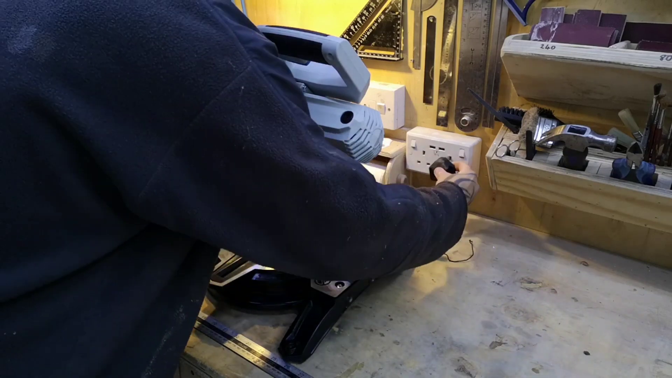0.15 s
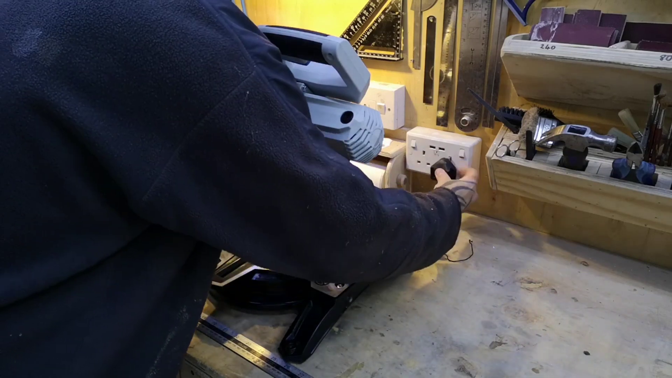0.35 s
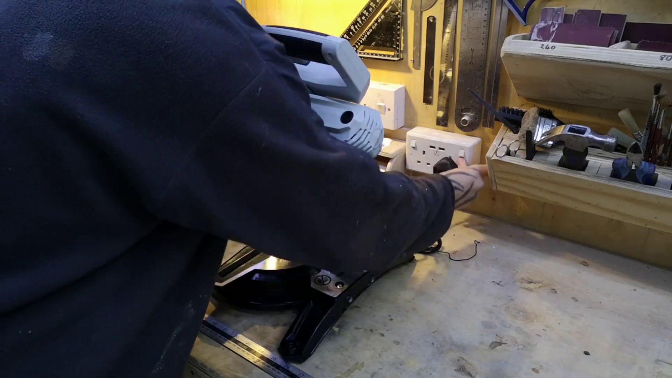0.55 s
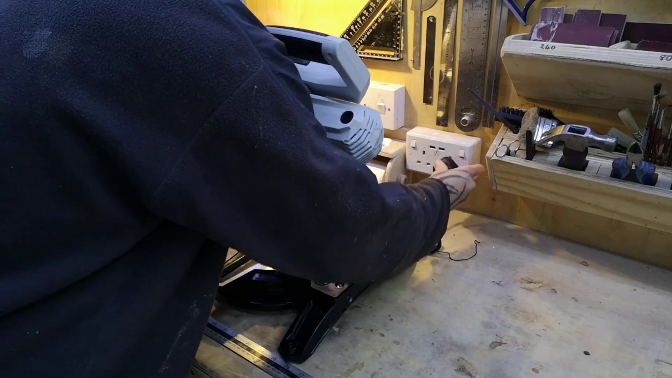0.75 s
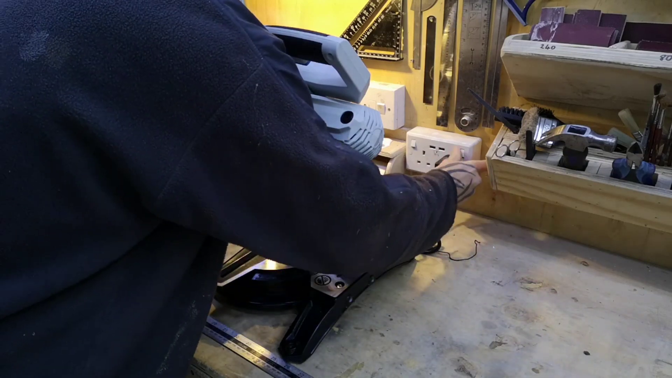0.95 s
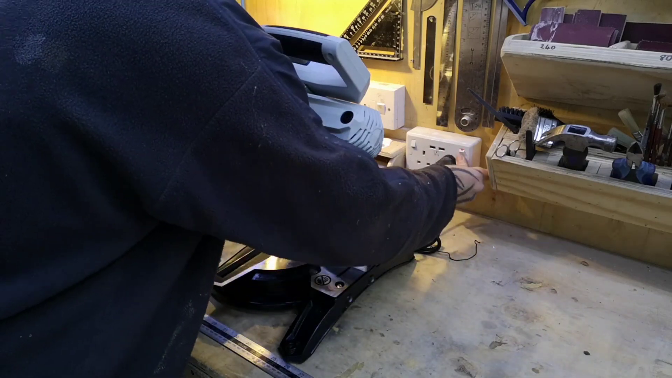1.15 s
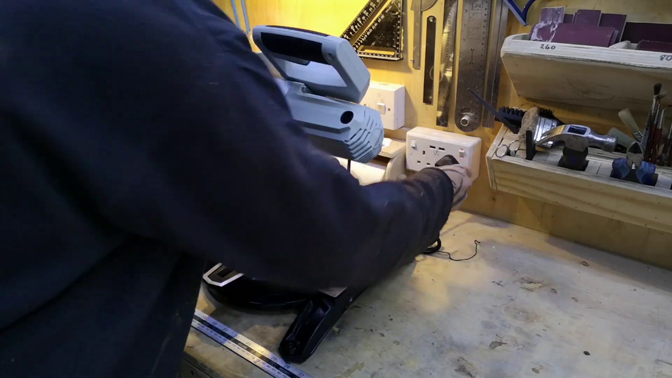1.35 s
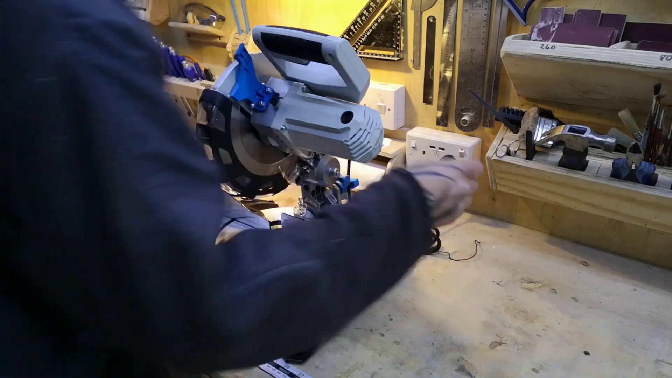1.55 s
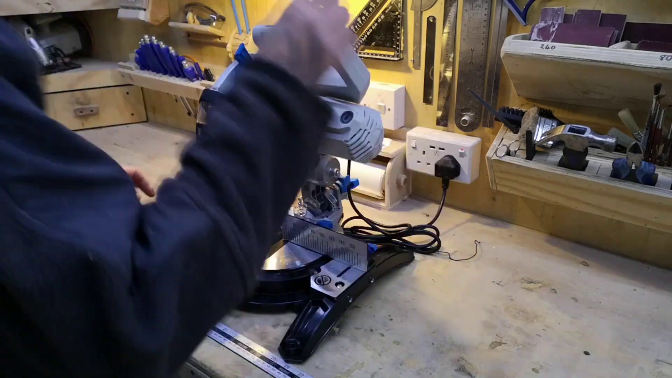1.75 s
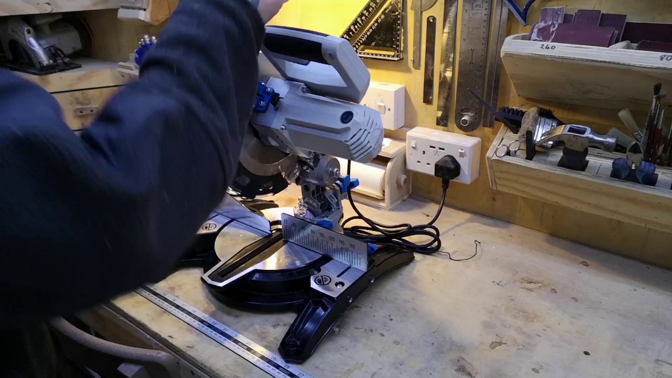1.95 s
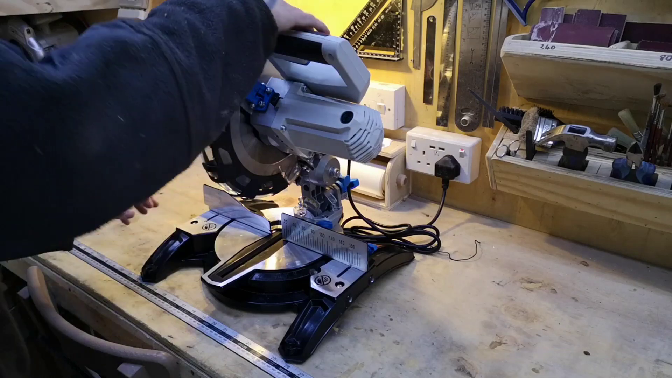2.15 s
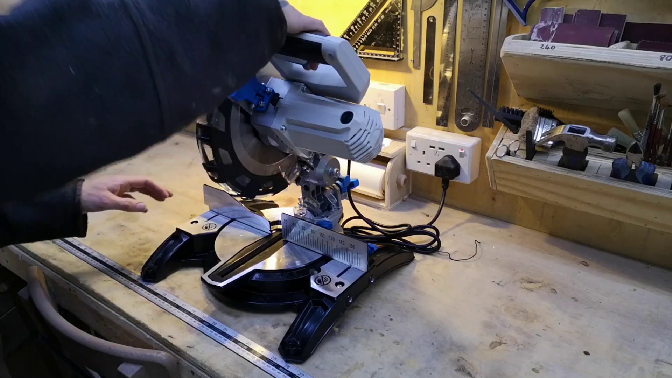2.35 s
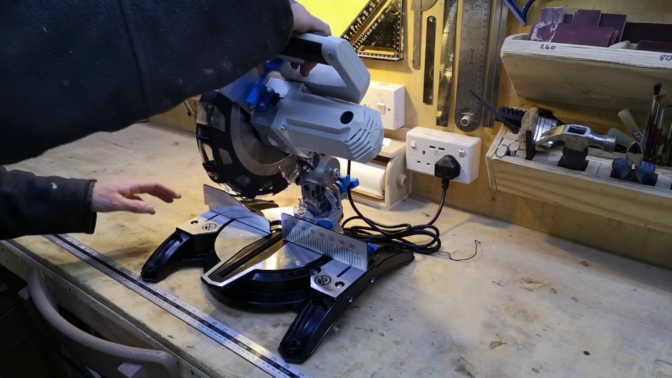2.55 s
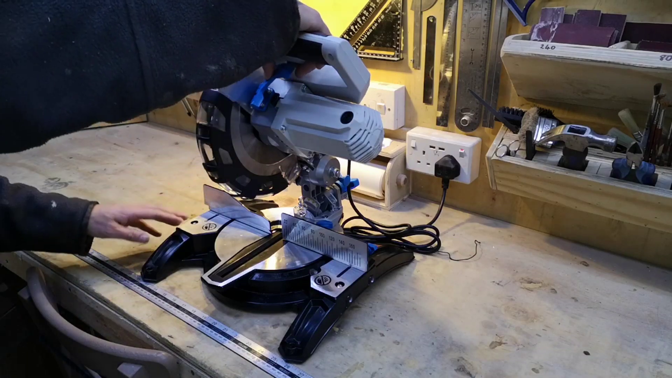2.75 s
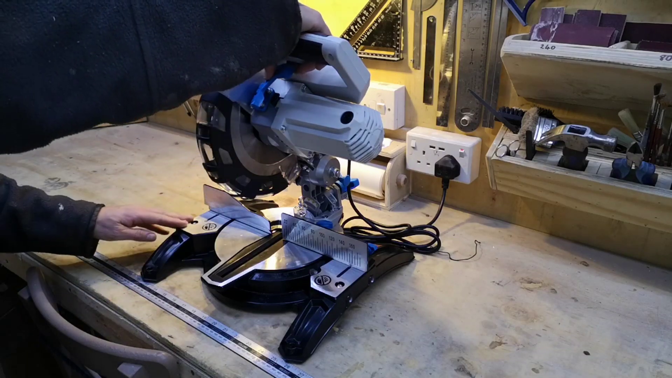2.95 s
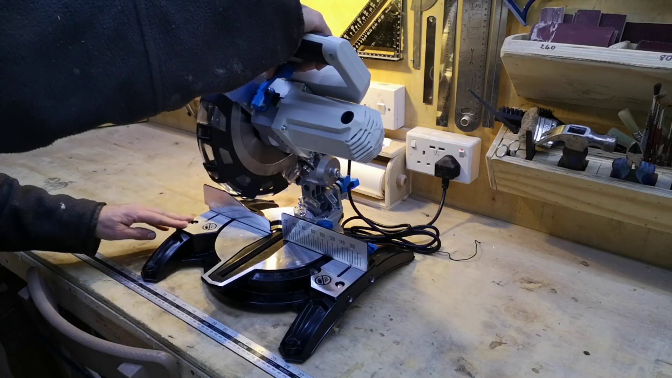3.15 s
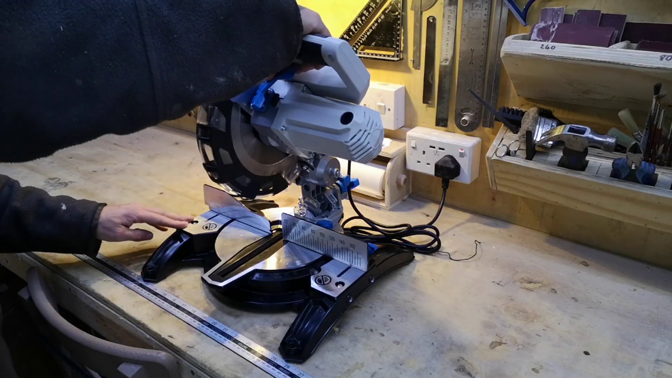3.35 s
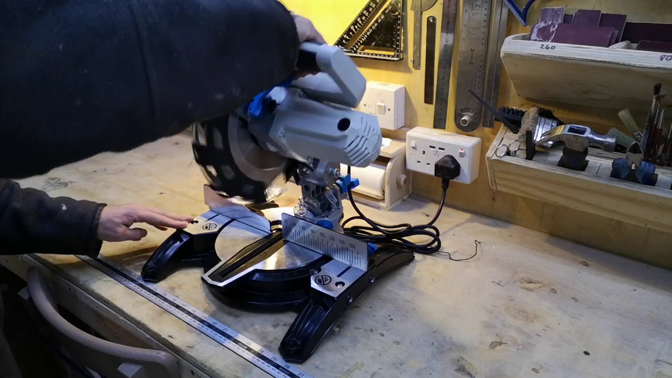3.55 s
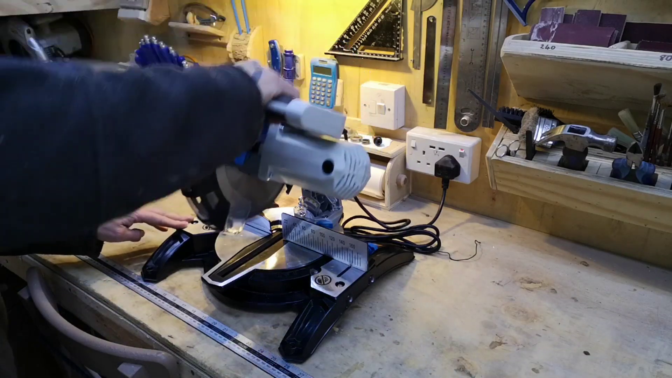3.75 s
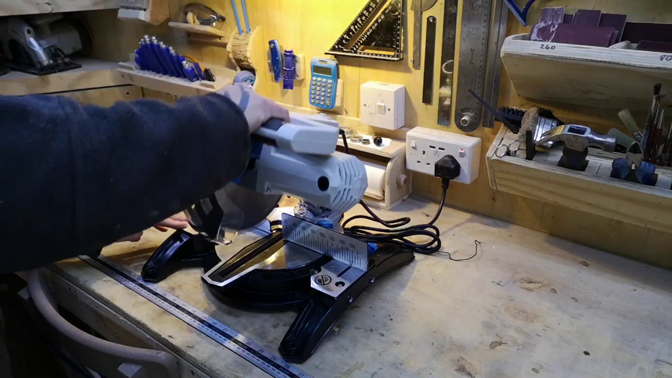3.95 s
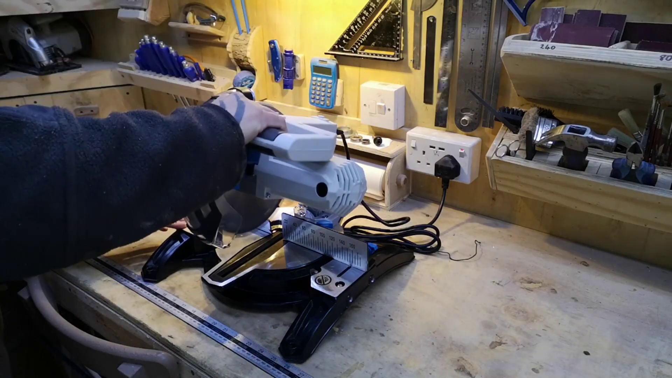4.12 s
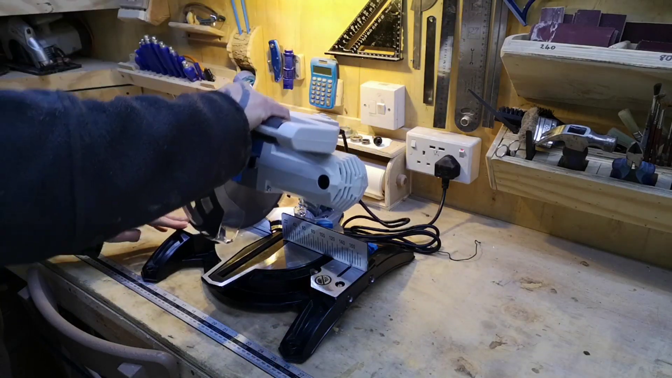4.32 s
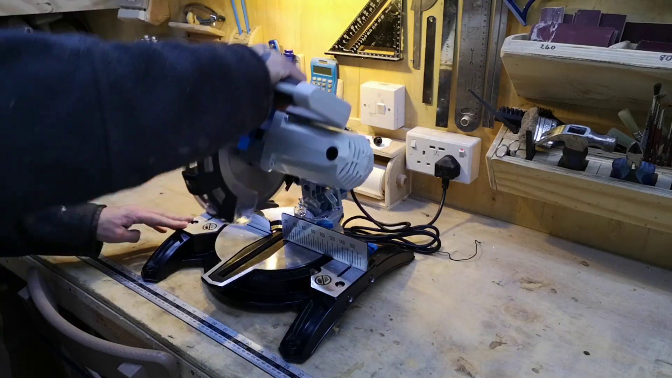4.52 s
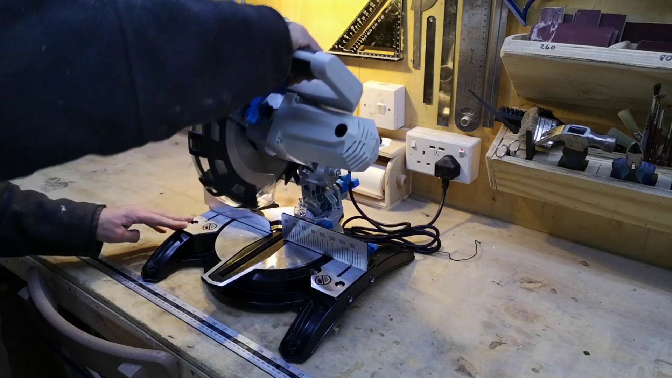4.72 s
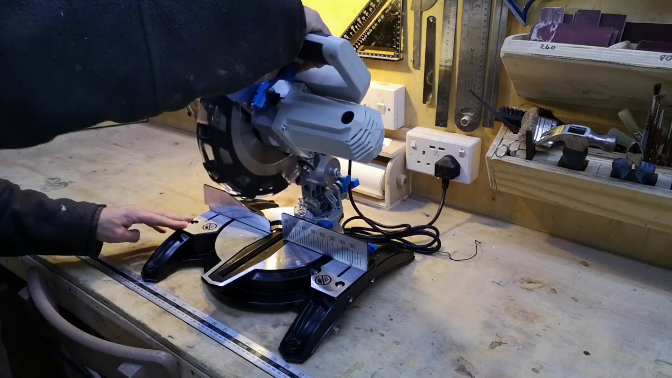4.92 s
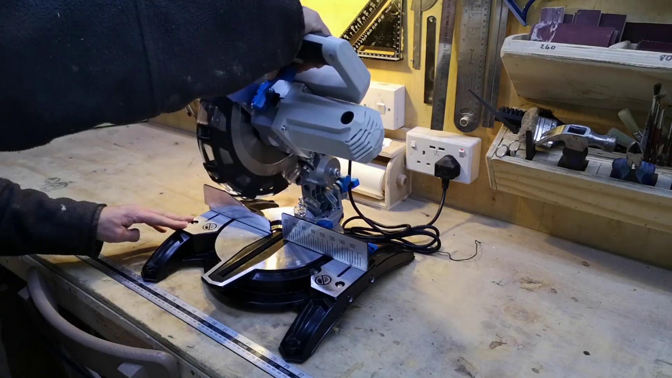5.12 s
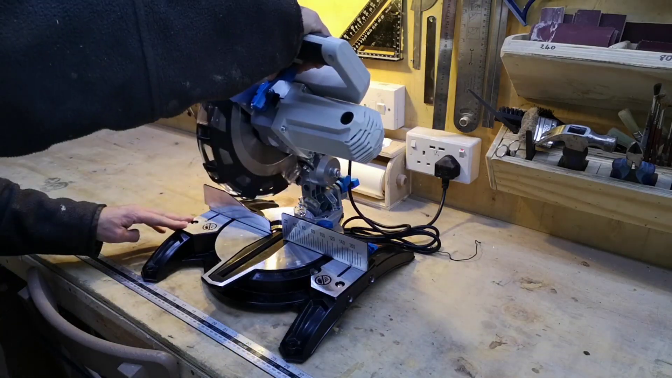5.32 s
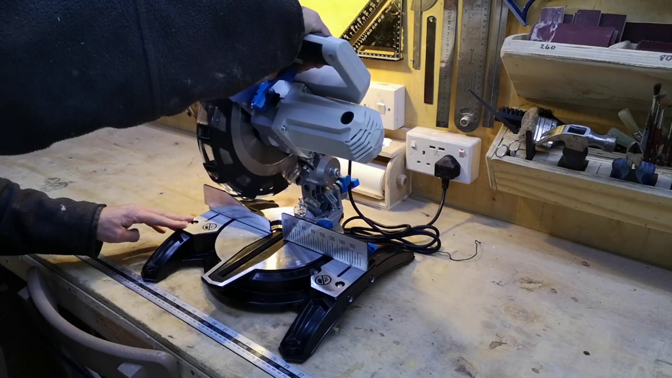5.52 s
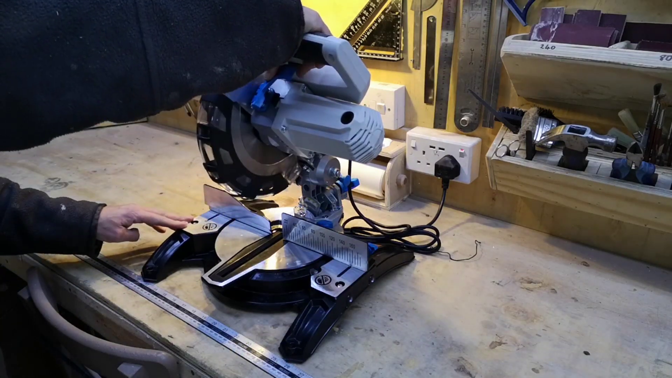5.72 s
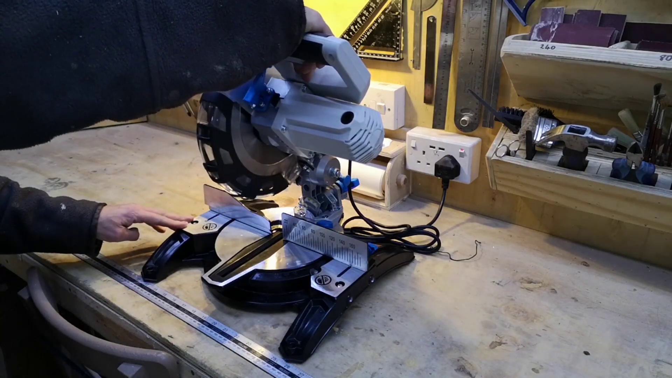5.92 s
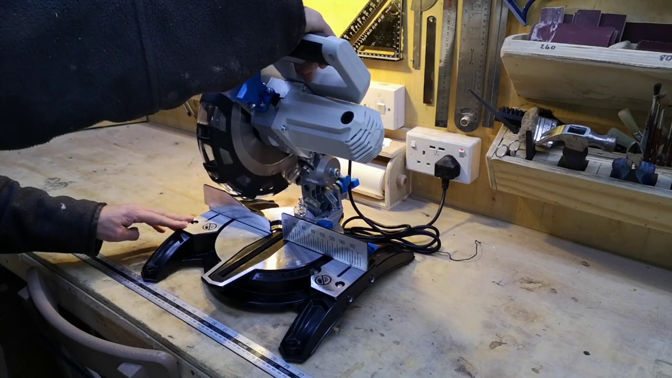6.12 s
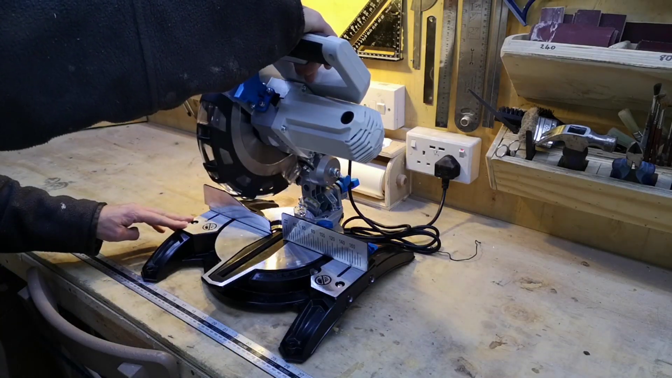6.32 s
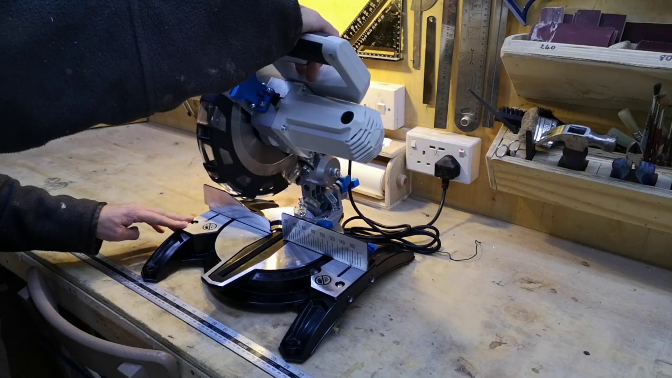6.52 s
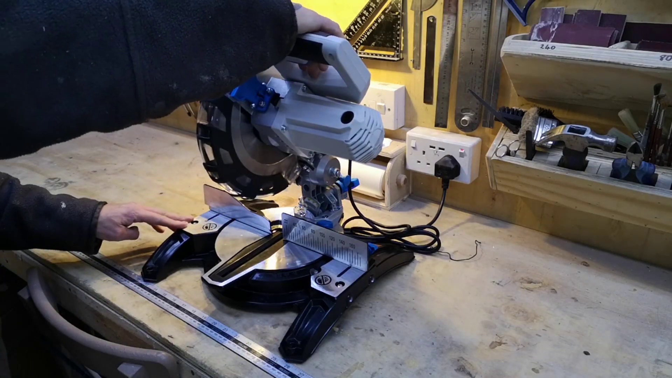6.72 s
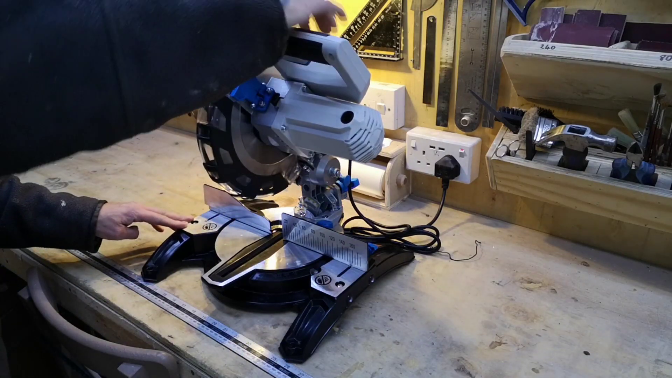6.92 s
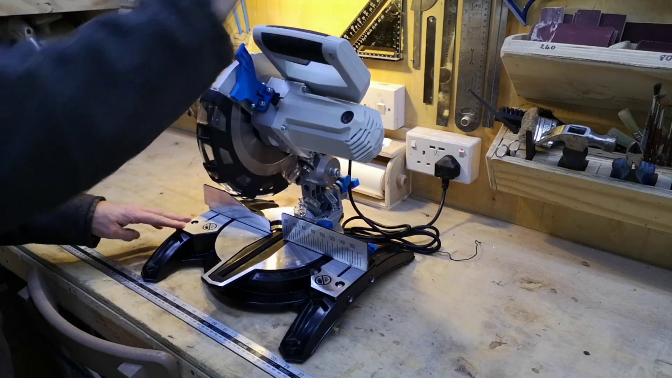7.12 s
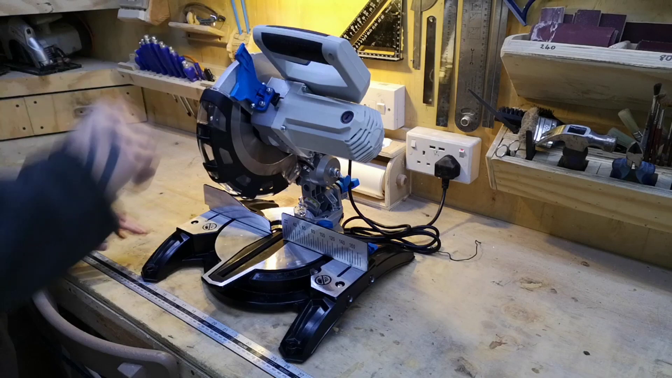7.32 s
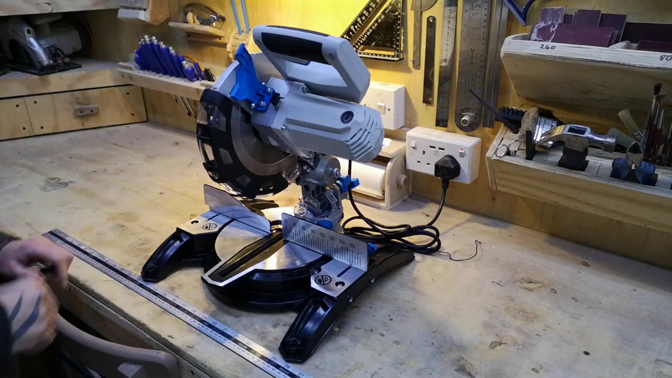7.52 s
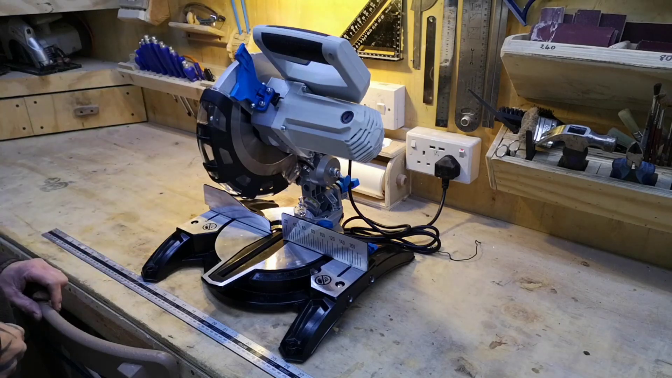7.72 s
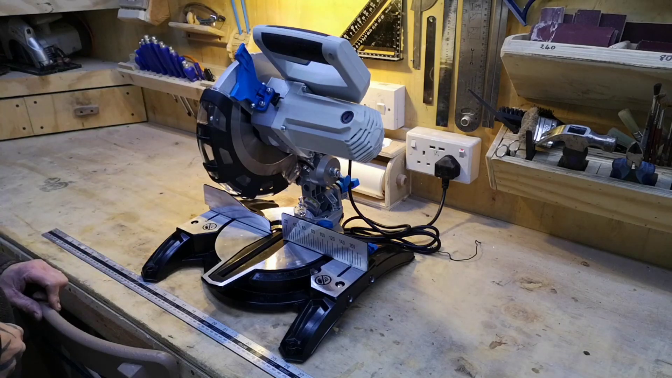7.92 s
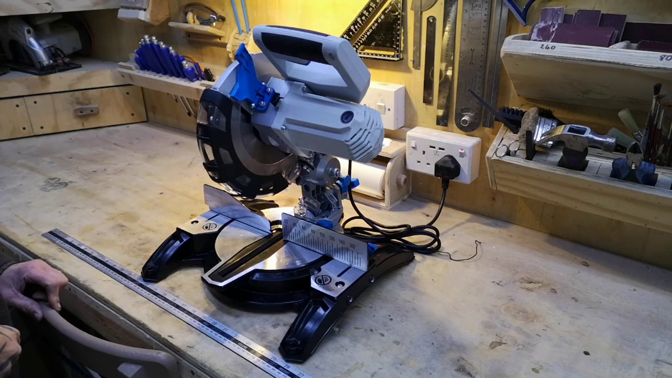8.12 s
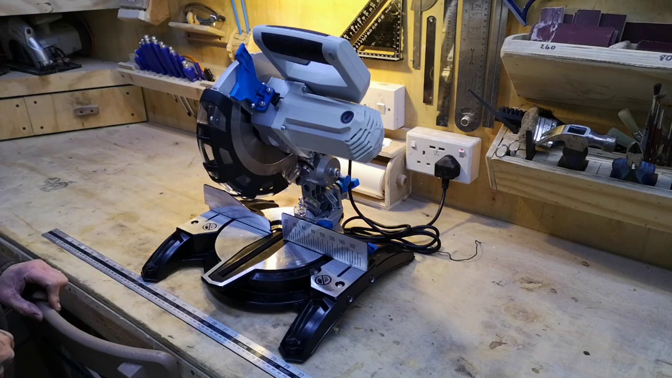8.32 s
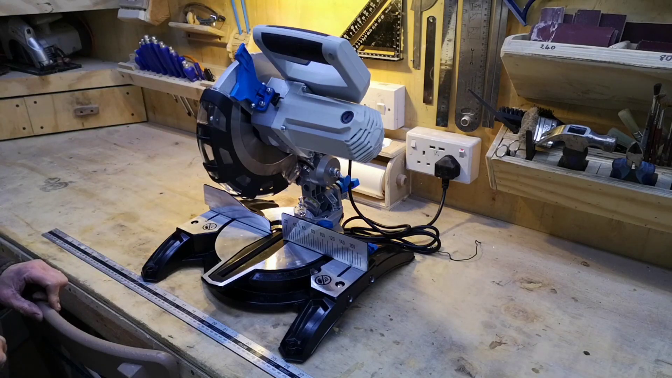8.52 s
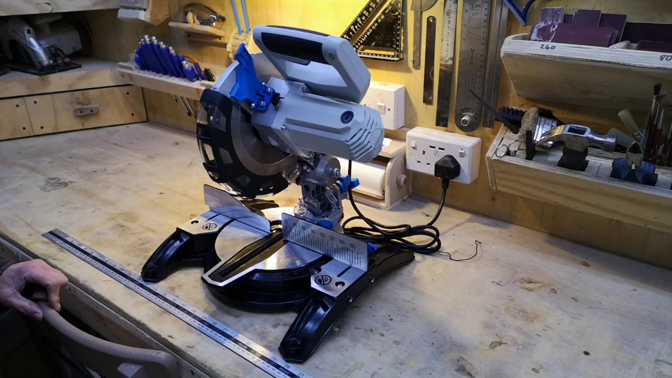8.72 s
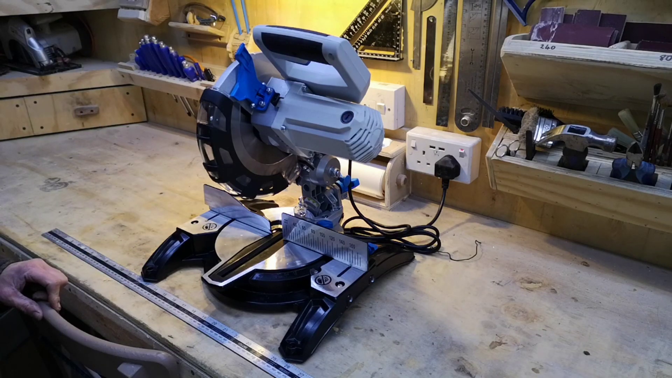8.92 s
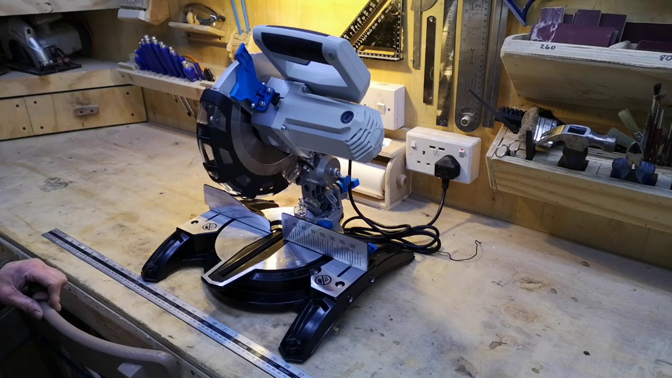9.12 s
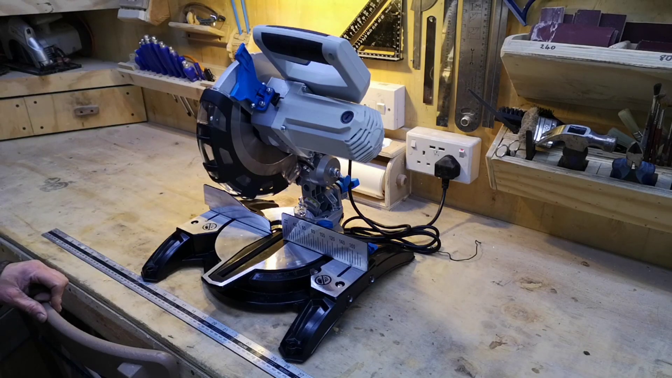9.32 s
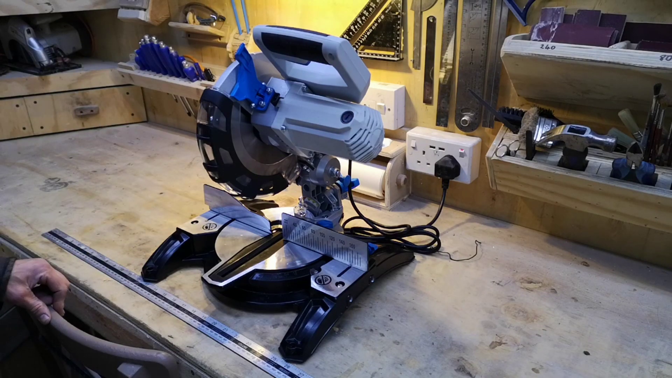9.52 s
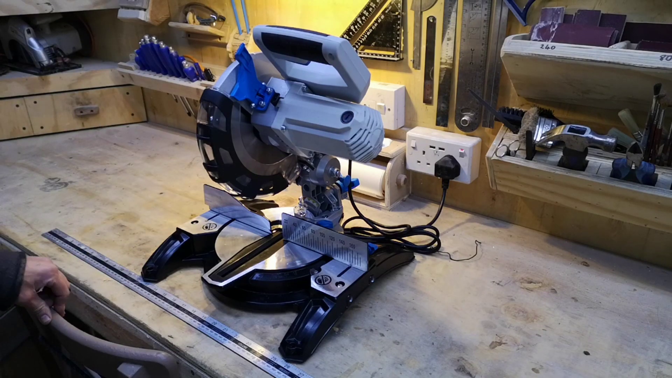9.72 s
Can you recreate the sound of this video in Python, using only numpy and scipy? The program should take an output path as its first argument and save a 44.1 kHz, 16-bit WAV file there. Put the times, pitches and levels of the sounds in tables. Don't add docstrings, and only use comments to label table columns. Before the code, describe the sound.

Handling clicks and bench thuds, a hard switch clack, a loud raspy electric saw running free about three seconds, then a long grinding spin-down.

```python
import sys
import numpy as np
from scipy import signal
from scipy.fft import rfft, irfft
from scipy.io import wavfile
from scipy.ndimage import uniform_filter1d

SR = 44100
rng = np.random.default_rng(int(sys.argv[2]) if len(sys.argv) > 2 else 0)


def wav_record(signal):
    frames = np.transpose(np.atleast_2d(signal))
    bounded = np.clip(frames, -1, 1)
    quanta = np.round(bounded * 32767).astype(np.int16)
    wavfile.write(sys.argv[1], SR, quanta)


def invert_db(level):
    return 10 ** (np.asarray(level, dtype=float) / 20)


N = 434826
T = np.arange(N) / SR
HZ = np.fft.rfftfreq(N, 1 / SR)


def noise():
    return rng.standard_normal(N)


def unit(x):
    return x / np.sqrt(np.mean(x ** 2))


def response(points, rings=(), lift_db=0., edge_db=-80.):
    f, db = np.transpose(points)
    gain = invert_db(np.interp(np.log(HZ + 1), np.log(f), db, left=edge_db, right=edge_db))
    for hz, width_hz, ring_db in rings:
        gain = gain * (1 + invert_db(lift_db + ring_db) / (1 + (2 * (HZ - hz) / width_hz) ** 2))
    return gain


def shape(x, *colour):
    return irfft(rfft(x) * response(*colour), N)


def band(x, lo_hz, hi_hz):
    edges_hz = [lo_hz, min(hi_hz, .49 * SR)]
    return signal.sosfilt(signal.butter(3, edges_hz, "band", fs=SR, output="sos"), x)


def ring(x, hz, t60_s):
    pole = np.exp(2j * np.pi * hz / SR - np.log(1000) / (t60_s * SR))
    return signal.lfilter([1], [1, -pole], x).imag


def walk(rate_hz):
    k = int(SR / rate_hz)
    held = np.repeat(rng.standard_normal(N // k + 1), k)
    return 1.173 * uniform_filter1d(uniform_filter1d(held, k), k)[:N]


# frequency in Hz, side minus mid in dB.
PORT_SIDE = [(60, -25), (110, -9), (200, -5), (380, -7.5), (690, 4), (1270, -6), (2340, -1), (4320, 1),
             (7960, 1), (14700, 0)]
# frequency in Hz, left minus right in dB.
PORT_LEAN = [(60, 4), (110, -3), (200, 2.5), (380, -1), (690, 2), (1270, 0), (2340, 2), (4320, 1),
             (7960, 7), (14700, -13)]


def ports(air, alike=0.21):
    mid, other = rfft(air)
    side = np.sqrt(1 - alike ** 2) * other + 1j * alike * mid
    side = side * response(PORT_SIDE, (), 0, 0)
    lean = np.sqrt(response(PORT_LEAN, (), 0, 0))
    return irfft(np.array([(mid + side) * lean, (mid - side) / lean]), N)


# frequency in Hz, level in dB per Hz.
SHOP = [(35, -32), (60, 4), (95, -4.5), (132, -10), (151, -5.5), (448, -23), (1100, -24.5), (1240, -24),
        (1830, -19.5), (2010, -22), (2650, -23), (3120, -27), (15000, -45.5)]


def still_floor():
    hiss = shape(rng.standard_normal((2, N)), SHOP, [(7500, 530, 4.6)])
    return unit(hiss) * invert_db(-57.5)


# start in seconds, sway in dB, thud in dB, rustle in dB.
PUSHES = [(.05, -65, -38, -45), (.22, -41, -46, -47), (.34, -43, -40, -46), (.5, -26.5, -21, -48),
          (.62, -38, -39, -64), (.9, -20, -36, -55), (1., -35, -27.5, -41.5), (1.12, -42, -50, -47),
          (2.25, -38.5, -64, -60), (2.55, -60, -70, -66), (2.95, -52, -62, -67)]


def pushed(column, rise_s, settle_t60_s):
    level = np.zeros(N)
    for push in PUSHES:
        t = np.maximum(T - push[0], 0)
        level += invert_db(push[column] - 60 * t / settle_t60_s) * (1 - np.exp(-t / rise_s))
    return level


def handling():
    sway_hz = 36.4 * (1 + 0.063 * walk(10))
    sway = pushed(1, 0.077, 0.69) * invert_db(7.5) * np.sin(2 * np.pi * np.cumsum(sway_hz) / SR)
    thud = pushed(2, 0.018, 0.32) * invert_db(-0.5) * unit(band(noise(), 51, 290))
    rustle = pushed(3, 0.04, 0.46) * invert_db(-8) * unit(shape(noise(), SHOP[5:]))
    return rustle, sway + thud


# start in seconds, peak in dB, panel in dB, treble in dB, decay t60 in seconds.
PLUG = [(0.068, -45.5, -2, -13, 0.58), (0.144, -39, 1.5, 12, 0.052), (0.227, -16, -3, -14, 0.062),
        (0.339, -10, -6.5, -14.5, 0.058), (0.355, -39.5, 14, -20, 0.13), (0.378, -36.5, 16, -27, 0.11),
        (0.468, -25, -1.5, -19, 0.22), (0.503, -16, -22, -6, 0.065), (0.517, -20, -13, -28, 0.13),
        (0.579, -28, 0, -5.5, 0.12), (0.63, -23, 0, -11, 0.022), (0.888, -35.5, 6.5, -12, 0.17),
        (0.914, -16, 0, -11.5, 0.084), (0.927, -25.5, 6.5, -18, 0.12), (0.949, -33, -4, -24, 0.27),
        (1.203, -25.5, -13, 0.5, 0.045), (1.227, -39, -11, -15, 0.065), (1.444, -51.5, -4, -1, 0.15),
        (2.199, -50, -13, 5, 0.32), (3.09, -7.5, -28, -32, 0.82)]
# start in seconds, peak in dB, note in dB, treble in dB, note in Hz.
GRIP = [
    (1.769, -60, 9, -13, 395),
    (1.901, -45, -19, -4, 662),
    (2.211, -49.5, 1, 9, 553),
    (2.236, -45.5, -16, 9, 568),
    (2.499, -54, -1, -17, 643),
    (3.036, -41.5, -22, -24, 681),
    (3.082, -22, -28, 5.5, 700),
]
# frequency in Hz, level in dB, decay t60 in seconds.
PANEL = [(193, -24, 0.08), (870, -20, 0.073), (1420, -27, 0.039)]
# frequency in Hz, level in dB per Hz.
KNOCK_BODY = [(290, -17), (500, -7), (620, -1), (866, 3.5), (1110, -3), (1470, 3.5), (2360, -3.5),
              (2780, -4), (5000, -14.5), (6500, -16.5), (11000, -120)]
# frequency in Hz, level in dB per Hz.
KNOCK_TOP = [(2350, 0), (4000, -2.5), (6370, -3), (7640, 2.5), (9690, -10.5), (10500, -26), (11300, -22),
             (13700, -35), (15000, -35)]


def knocks(rattle_s=0.012, socket_hz=344, grip_t60_s=0.089):
    mid, top = unit(shape(noise(), KNOCK_BODY)), unit(shape(noise(), KNOCK_TOP))
    grit = noise()
    snap = unit(band(grit, 12000, 14000))
    t = T[:SR // 2]
    rattle = np.exp(-t / rattle_s)
    contacts = [(*k[:4], socket_hz, k[4]) for k in PLUG] + [(*k, grip_t60_s) for k in GRIP]
    out = np.zeros(N)
    for start_s, peak_db, panel_db, treble_db, note_hz, t60_s in contacts:
        a = int(start_s * SR)
        span = slice(a, a + len(t))
        env = invert_db(-60 * t / max(t60_s, .02)) * (1 + 2.6 * np.exp(-t / 0.003))
        hit = env * (mid[span] + invert_db(treble_db) * top[span])
        push = grit[span] * rattle
        panel = ring(push, note_hz, 0.38 * t60_s)
        panel = panel + sum(invert_db(db) * ring(push, hz, decay_s) for hz, db, decay_s in PANEL)
        hit = hit + invert_db(panel_db + 12.5) * panel / np.abs(panel).max()
        hit = hit + invert_db(2 * min(treble_db, 0) - 10) * snap[span] * rattle
        out[span] += invert_db(peak_db - 14.5) * hit * np.minimum(t / 0.0013, 1)
    return out * invert_db(np.array([[2.2], [-2.2]]))


def room(x, t60_s=0.25, echo_db=4.5, mono_hz=320):
    t = T[:SR // 3]
    echo = rng.standard_normal((2, len(t))) * invert_db(-60 * t / t60_s) * (t > .002)
    echo = echo / np.sqrt(np.sum(echo ** 2, axis=1, keepdims=True)) * invert_db(echo_db)
    echo[0, 3] += 1
    echo[1, 0] += 1
    left, right = signal.fftconvolve(x, echo, axes=1)[:, :N] / 2
    side = band(left - right, mono_hz, SR)
    return np.array([left + right + side, left + right - side])


PINION, GEAR, VANES, TIPS = 6, 38, 27, 40
ON_S, CUT_S, TOP_SPEED = 3.09, 5.816, 489.6
# shortfall in turns per s, time constant in seconds.
SHORTFALL = [(328, .171), (79, .66)]
DRAG = (41.2, .1869, .000934)


def rotor():
    since = np.maximum(T - ON_S, 0)
    pulling = TOP_SPEED - sum(short * np.exp(-since / tau_s) for short, tau_s in SHORTFALL)
    slowing = [pulling[int(CUT_S * SR)]]
    for _ in range(4200):
        slowing.append(slowing[-1] - np.polyval(DRAG[::-1], slowing[-1]) / 1000)
    coasting = np.interp(T, CUT_S + np.arange(len(slowing)) / 1000, slowing)
    return np.where(T < CUT_S, pulling, coasting)


def law(speed, top_db, decade_db, start_db=0):
    wake = np.exp(-np.maximum(T - 3.1, 0) / 0.075)
    return top_db + decade_db * np.log10(speed / TOP_SPEED) + start_db * wake


def lift(hz, body):
    return 20 * np.log10(1 + sum(invert_db(db) / (1 + (2 * (hz - f) / width_hz) ** 2) for f, width_hz, db in body))


def whine(order, turns, db, smear_rad, rate_hz):
    def waver():
        level = invert_db(db + 4.8 * walk(rate_hz / 3))
        return level * np.sin(2 * np.pi * order * turns + smear_rad * walk(rate_hz))
    return np.array([waver(), waver()])


# frequency in Hz, level in dB, decay t60 in seconds.
KICK = [
    (1096, -15, 0.44),
    (1165, -11, 0.21),
    (3100, -8, 0.026),
]


def gear_kick():
    slam = 1. * (np.arange(N) == int(3.092 * SR))
    kick = sum(invert_db(db) * ring(slam, hz, t60_s) for hz, db, t60_s in KICK)
    return kick * np.array([[1], [.4]])


INRUSH_DB = [-43, -41, -27.5, -38, -37, -40]


def inrush_hum(mains_hz=50):
    surge = np.exp(-((T - 3.2) / 0.11) ** 2)
    return surge * sum(invert_db(db) * np.sin(2 * np.pi * (k + 2) * mains_hz * T + k * k)
                       for k, db in enumerate(INRUSH_DB))


def teeth(turns, speed):
    tooth = (PINION * turns).astype(int)
    size = invert_db(1.4 * rng.standard_normal(N // 8))[tooth]
    scrape = .5 + np.exp(-(PINION * turns - tooth) / 0.98)
    slack = np.clip(1 - speed / 400, 0, 1)
    chatter_hz = 38.15 * (1 + 0.299 * walk(15))
    chatter = np.sin(2 * np.pi * np.cumsum(chatter_hz) / SR) + 0.73 * walk(60)
    wobble = invert_db(1.5 * slack * chatter + walk(9))
    return size * scrape * wobble * rng.standard_normal((2, N))


# time in seconds, level in dB, left minus right in dB.
ROAR = [(3.08, -2, -5), (3.1, -27, 4), (3.16, -17.5, 5), (3.29, -14.5, 5), (3.4, -17, 4),
        (3.78, -16.5, 4.5), (3.88, -20.5, 4.5), (4.1, -17, 4.5), (5.65, -17, 5), (6.03, -20, 4.5),
        (6.07, -19.5, 3), (6.37, -17.5, 3.5), (7.4, -18, 4.5), (7.8, -21, 10.5), (8.18, -21.5, 9),
        (8.35, -25, 4), (9.42, -32, 4.5), (9.86, -41, 3.5)]


def columns(table):
    s, *cols = np.transpose(table)
    return [np.interp(T, s, c) for c in cols]


# frequency in Hz, level in dB per Hz.
DRIVEN = [(150, -22), (250, -11), (312, -22), (570, -18.5), (700, -12), (817, -15), (1020, -8.5),
          (1830, 0.5), (2810, -4), (4170, -8.5), (6300, -16), (7740, -11.5), (8580, -16), (13200, -7.5),
          (15100, -22)]
# frequency in Hz, level in dB per Hz.
COASTING = [(150, -13), (250, -2.5), (307, -25), (426, -21.5), (472, -17.5), (921, -6.5), (1150, -7),
            (1280, -1.5), (2410, -0.5), (2760, -2.5), (3010, -2), (4950, -3), (7740, 1), (8580, -1.5),
            (15100, 1.5)]
# frequency in Hz, width in Hz, level in dB.
RINGS = [(345, 14, -37), (429.6, 6.8, 10), (1057, 24, 6), (1255, 19, 3.5), (1763, 250, -8.5),
         (2140, 6.7, 4.5), (2716, 184, 0.5), (3370, 160, -6.5), (3884, 250, -5.5), (5730, 230, -7),
         (7060, 410, -0.5), (7704, 250, 0.5)]
# dB at top speed, dB per decade of speed, dB at switch-on.
TREBLE_DB = (-1.5, 3, -8.5)
AIR_DB = (-16, 17.5, -15)


def clatter(turns, speed):
    force = teeth(turns, speed)
    coast = np.clip((T - 5.77) / 2.06, 0, 1)
    housing = (1 - coast) * unit(shape(force, DRIVEN, RINGS, -5.5))
    housing = housing + coast * unit(shape(force, COASTING, RINGS, 3.5))
    roar_db = columns(ROAR)[0]
    bands = [(300, 4040, roar_db - 0.5),
             (5140, 9160, roar_db + law(speed, *TREBLE_DB)),
             (10400, 13440, roar_db + law(speed, *AIR_DB))]
    out = 0
    for lo_hz, hi_hz, db in bands:
        part = band(housing, lo_hz, hi_hz)
        out = out + part / np.sqrt(uniform_filter1d(part ** 2, SR // 2)) * invert_db(db)
    return out


# dB pulling, dB coasting at top speed, dB per decade of speed, share of the guard's lift.
TONES = [
    (-26, -19.5, 30, .25),
    (-46, -36, 12, 0),
    (-54, -49, 4, 0),
    (-48, -48, -24, 0),
]
# frequency in Hz, width in Hz, lift in dB.
GUARD = [(345, 20, 21), (428, 26, 18), (1750, 250, 8), (2200, 140, 13), (2740, 190, 21), (3450, 400, 18),
         (4000, 250, 15), (7900, 1400, 8)]
# frequency in Hz, level in dB.
GUARD_SKIN = [(150, -15), (5000, -8.5), (9000, 5), (11500, -12), (16000, -24)]


def gear_and_fan(turns, speed):
    loose = np.clip((T - CUT_S) / 0.096, 0, 1)
    levels_db = []
    for order, tone in zip((PINION, 2 * PINION, 4 * PINION, VANES), TONES):
        pull_db, coast_db, decade_db, share = tone
        level_db = (1 - loose) * pull_db + loose * law(speed, coast_db, decade_db)
        levels_db.append(level_db + share * lift(order * speed, GUARD))
    mesh_db, second_db, fourth_db, vane_db = levels_db
    load_db = np.clip(30 * np.log10(np.abs(np.gradient(speed)) * SR / 21 + 1e-9), -13, 0)
    slowed_db = -np.clip(230 - speed, 0, 110) / 8
    mesh_db = mesh_db + load_db + slowed_db
    mesh = whine(PINION, turns, mesh_db, 1.76 * np.minimum(speed / 130, 1), 450)
    overtones = whine(2 * PINION, turns, second_db + 1.5, 1.9, 480)
    overtones = overtones + whine(4 * PINION, turns, fourth_db + 7.0, 1.5, 320)
    stall_db = np.maximum(340 - speed, 0) / 5
    fan = whine(VANES, turns, vane_db + 6.0 - stall_db, .45, 80)
    tips_db = mesh_db - 0.5 - 8 * (1 - loose) + slowed_db
    tips = whine(TIPS * PINION / GEAR, turns, tips_db, 1, SR / 200)
    flat = [(150, 0), (16000, 0)]
    return shape(mesh, flat, GUARD[:2]) + shape(overtones, GUARD_SKIN, GUARD) + fan + tips


# dB at top speed, dB per decade of speed.
BLADE_DB = (-52, -1)
ARMATURE_DB = (-56, -7)
OVAL_DB = (-81, -26)
# frequency in Hz, width in Hz, lift in dB.
LEGS = [(29.9, 4.4, 23), (48, 15, 27), (75.8, 3.8, 16)]
# frequency in Hz, width in Hz, lift in dB.
MOUNT = [(32.8, 4.8, 9), (46, 7.4, 23), (68, 14, 22), (99.2, 6.3, 18), (124, 11, 19.7), (147, 23, 18)]


def unbalance(turns, speed):
    blade = 2 * np.pi * turns * PINION / GEAR
    blade_db = law(speed, *BLADE_DB) + lift(speed * PINION / GEAR, LEGS)
    out = invert_db(blade_db + 4) * (np.sin(blade) + 0.17 * np.sin(2 * blade))
    out = out + whine(1, turns, law(speed, *ARMATURE_DB) + lift(speed, MOUNT), 0.45, 25)[0]
    oval_db = law(speed, *OVAL_DB) + lift(2 * speed, MOUNT[2:3])
    return out + invert_db(oval_db) * np.sin(4 * np.pi * turns)


# dB at top speed, dB per decade of speed.
RUMBLE_DB = (-40.5, 3.5), (-46.5, -10.5)
# time in seconds, length in seconds, top in dB, legs in dB.
ROCKS = [
    (3.213, 0.11, -28.5, -53),
    (3.45, 0.6, -46.5, -36.5),
    (4.95, 0.23, -43.5, -42),
    (7.258, 0.46, -35.5, -33.5),
    (8.387, 0.14, -48, -33),
]
# frequency in Hz, width in Hz, level in dB.
BENCH = [(48, 10, 5), (74, 8, 11.5), (123, 8.1, 11), (144, 12.5, 11), (184.7, 6.3, 5.5), (240, 39, 0.5)]


def bench_rumble(speed):
    levels = []
    for k, steady in enumerate(RUMBLE_DB):
        rocking = sum(invert_db(r[2 + k]) * np.exp(-((T - r[0]) / r[1]) ** 2) for r in ROCKS)
        levels.append(invert_db(law(speed, *steady)) + rocking)
    top = unit(shape(noise(), [(85, 3.5), (110, 3.5), (200, -3.5), (330, -11)], BENCH))
    legs = unit(shape(noise(), [(22, 3), (50, 2.0), (95, -12.5)], BENCH))
    return levels[0] * invert_db(1.5 * walk(11)) * top + levels[1] * invert_db(1.2 * walk(8.4)) * legs


def saw():
    speed = uniform_filter1d(rotor(), SR // 20)
    on = np.clip((T - 3.091) / 0.0041, 0, 1)
    turns = np.cumsum(speed * (on > 0)) / SR
    air = on * (clatter(turns, speed) + gear_and_fan(turns, speed)) + gear_kick()
    bench = on * (inrush_hum() + unbalance(turns, speed) + bench_rumble(speed))
    lean_db = columns(ROAR)[1] - 3
    return air, invert_db(np.array([lean_db, -lean_db]) / 2), bench


def scene():
    rustle, sway = handling()
    air, pan, bench = saw()
    return pan * ports(air) + room(knocks() + rustle) + bench + sway + ports(still_floor())


def low_pass(x):
    return signal.sosfilt(signal.butter(12, 15260, fs=SR, output="sos"), x)


def record(dry):
    x = signal.sosfilt(signal.butter(2, 24., "high", fs=SR, output="sos"), dry)
    x = np.tanh(1.05 * x) / 1.05
    return low_pass(x)


dry = scene()
out = record(dry)
wav_record(out)
```